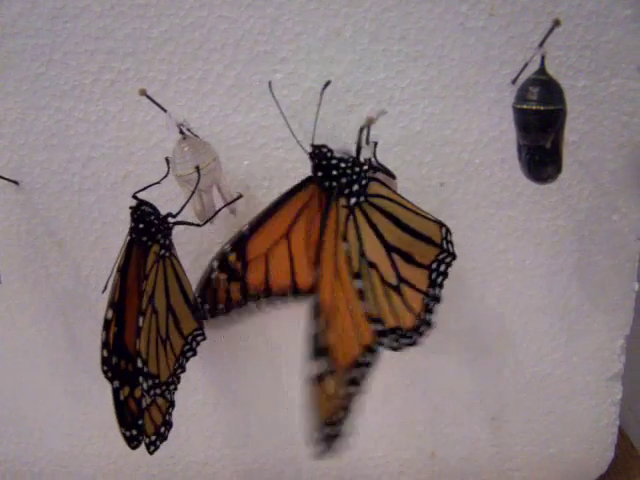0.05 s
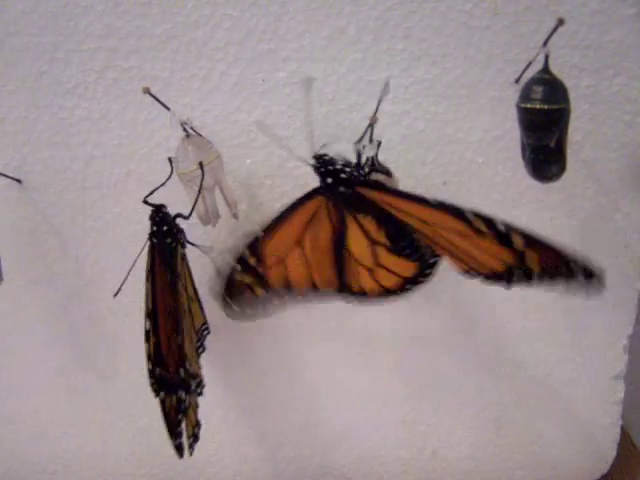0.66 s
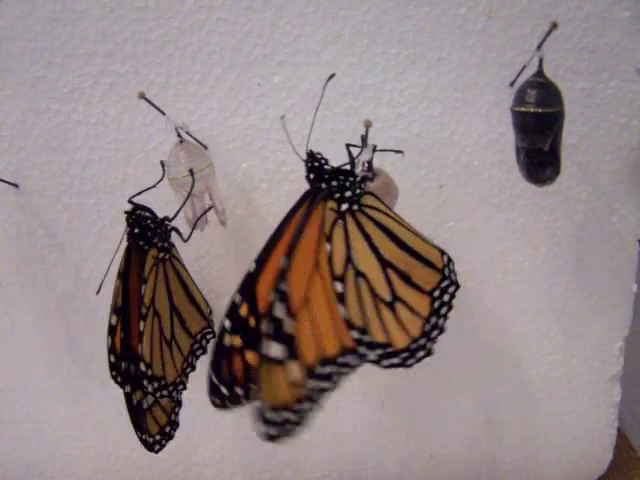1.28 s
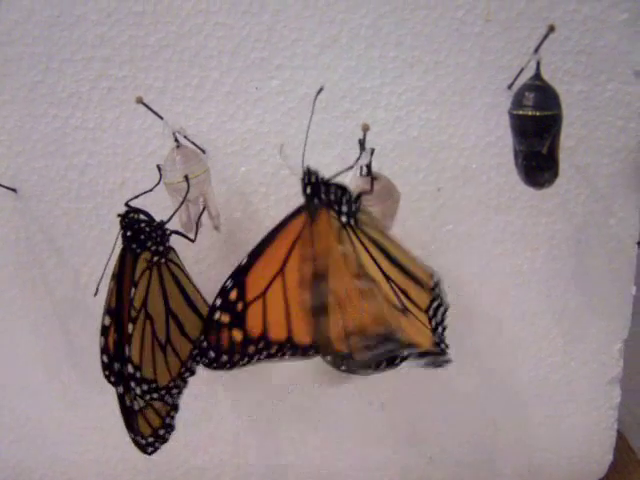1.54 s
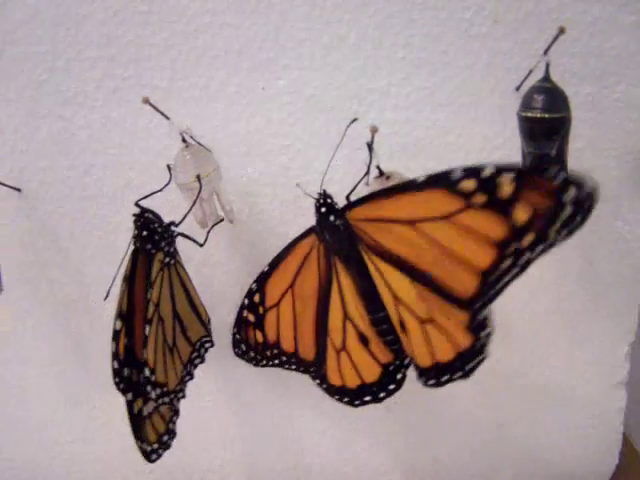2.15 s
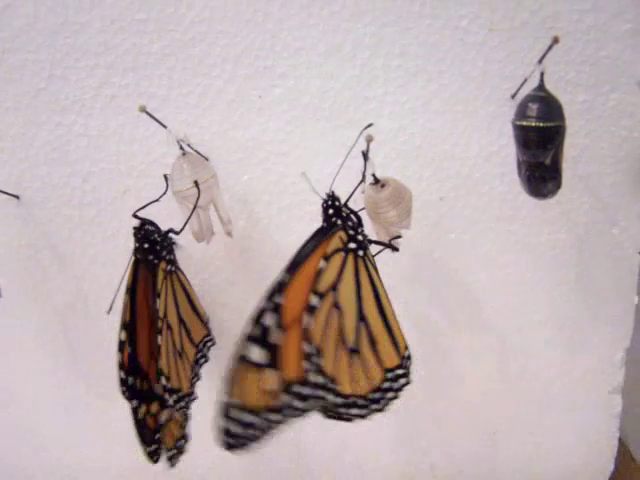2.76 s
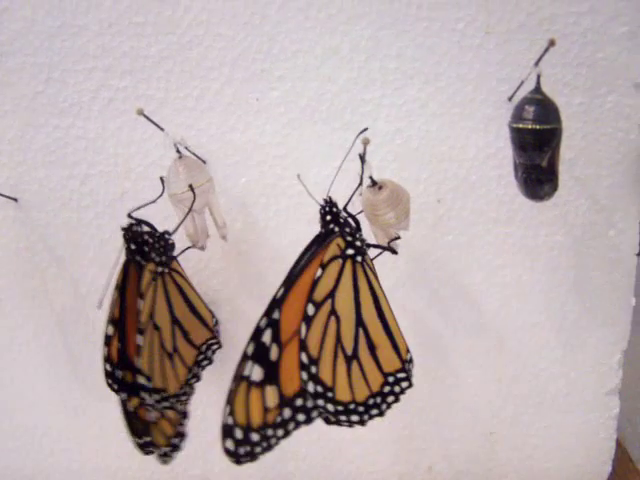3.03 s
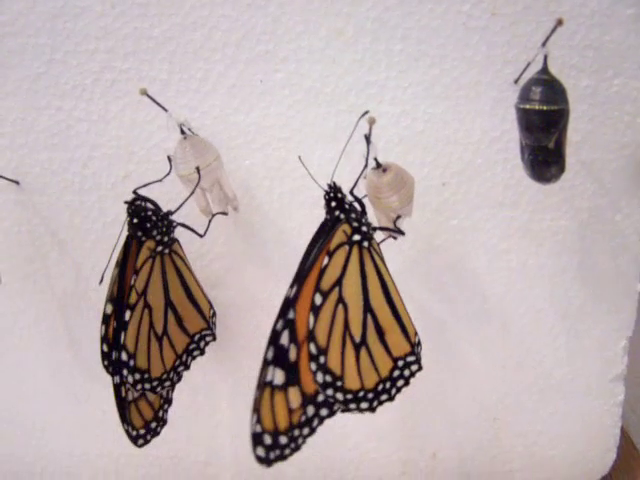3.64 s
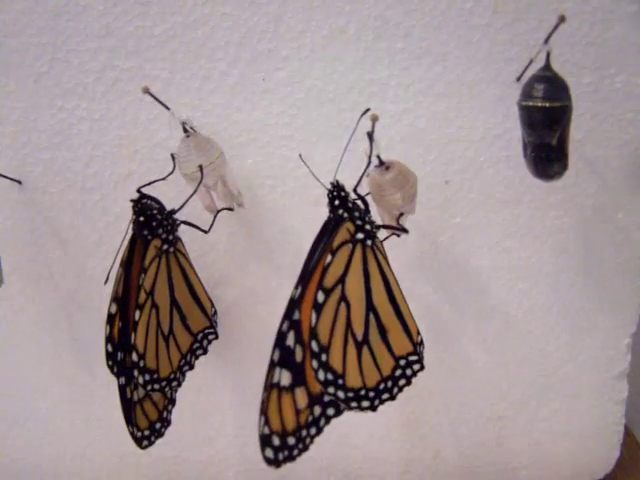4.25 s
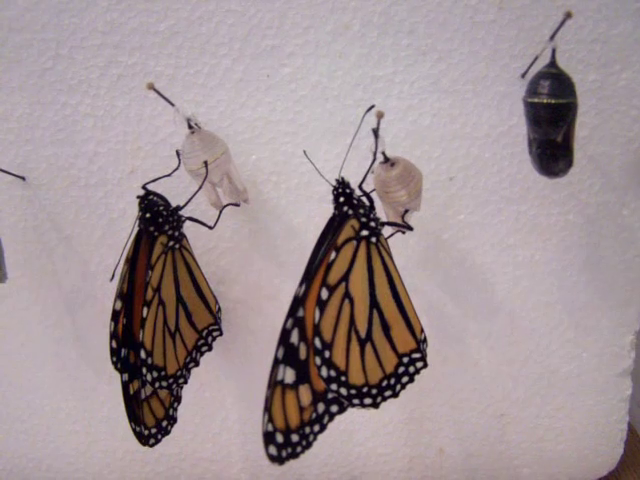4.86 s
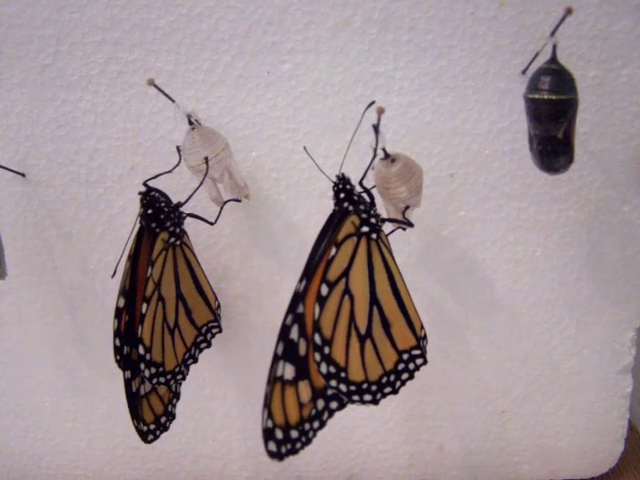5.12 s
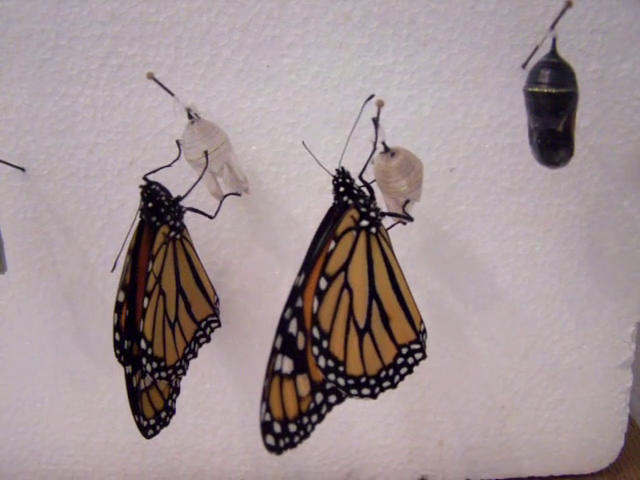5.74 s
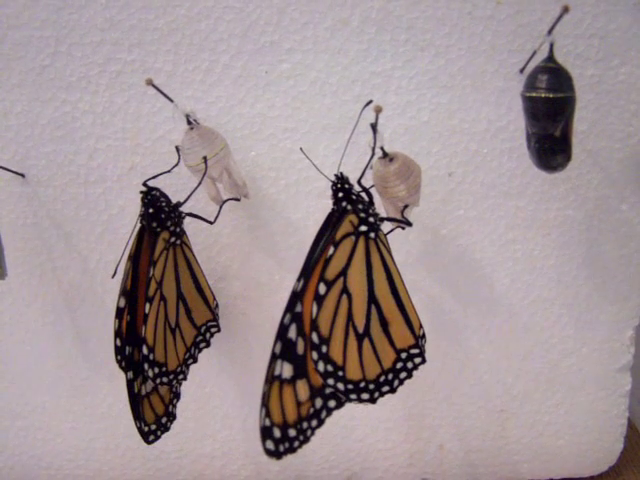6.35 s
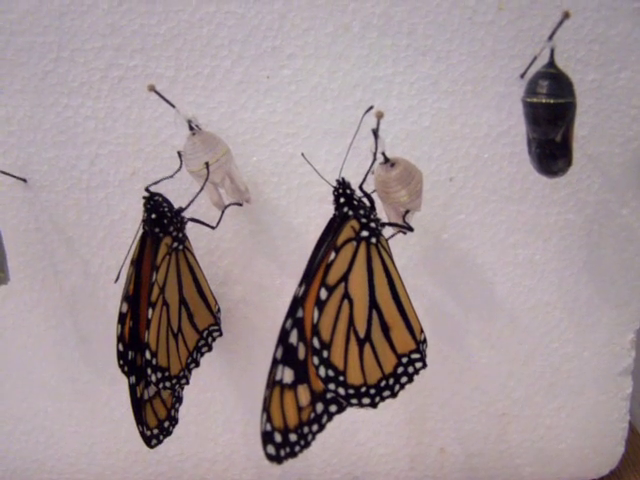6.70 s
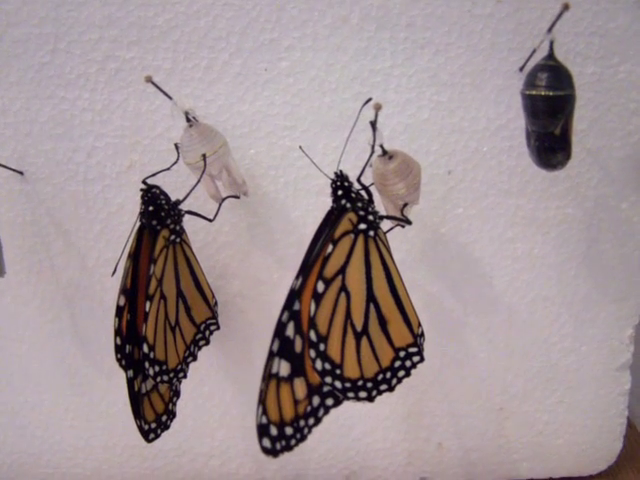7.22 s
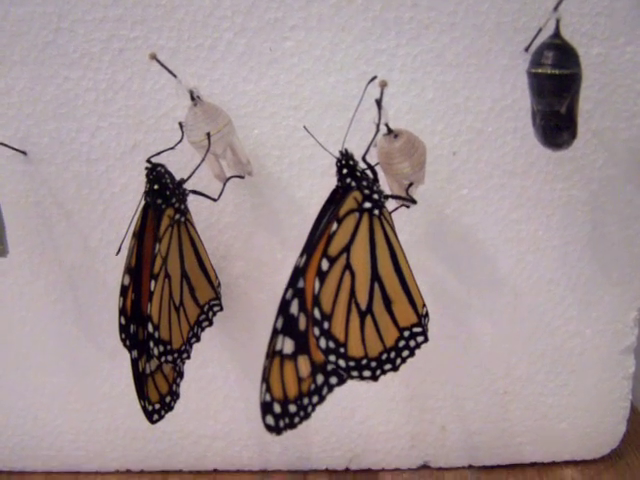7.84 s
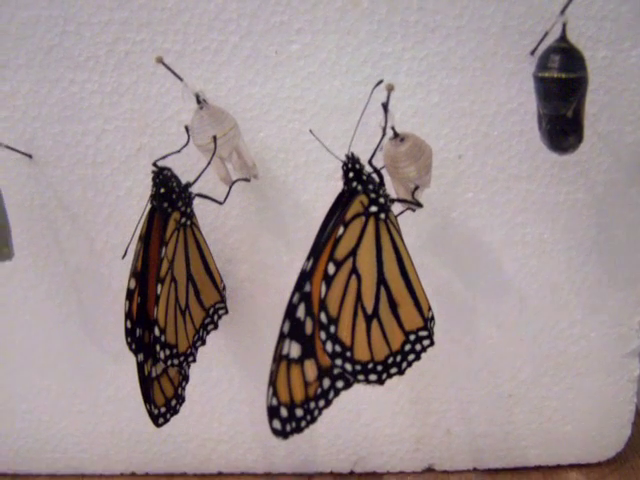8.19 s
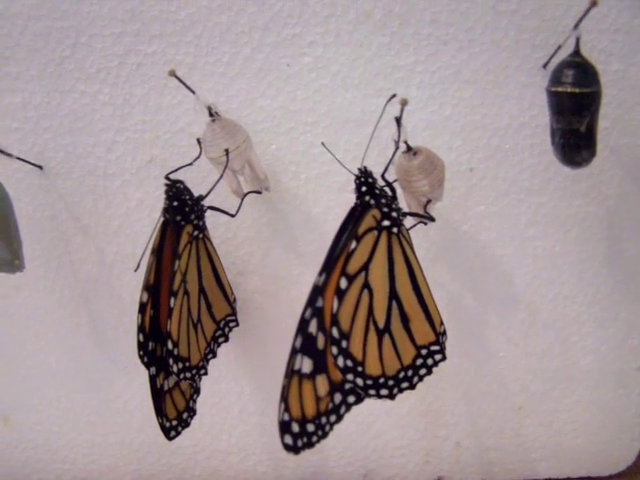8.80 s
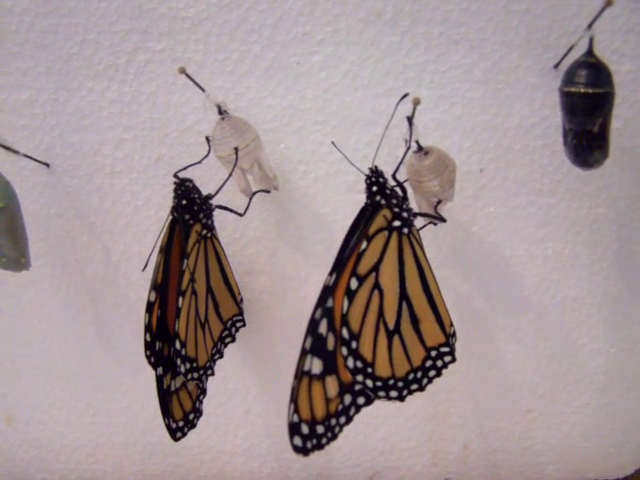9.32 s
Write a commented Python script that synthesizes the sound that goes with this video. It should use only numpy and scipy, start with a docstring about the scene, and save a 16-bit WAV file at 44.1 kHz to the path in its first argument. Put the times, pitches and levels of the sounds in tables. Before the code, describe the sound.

Light, dry pattering and rustling of wings on foam, with small claw squeaks, dying away to steady hiss and a few faint microphone bumps.

```python
"""Butterfly on a foam board

A freshly emerged butterfly flaps and scrambles on an upright foam board, then hangs still.
Wing edges and claws tap and brush the board, and a slipping claw squeaks on the foam.
The close camera is bumped softly a few times, over quiet room hiss and a thin electronic whine."""
import sys
import numpy as np
from scipy.fft import rfft, irfft, next_fast_len
from scipy.io import wavfile
from scipy.ndimage import map_coordinates

SR = 44100
rng = np.random.default_rng(int(sys.argv[2]) if len(sys.argv) > 2 else 0)


def bounce(signal):
    """Save signal as a 16-bit WAV file at the path given by the first command-line argument."""
    frames = np.transpose(np.atleast_2d(signal))
    limited = np.clip(frames, -1, 1)
    pcm = np.round(limited * 32767).astype(np.int16)
    wavfile.write(sys.argv[1], SR, pcm)


N = 414981

# Sweeps of a wing over the foam: start_s, length_s, level_db, spot_hz (where the touched spot rings)
STROKES = [(0, 0.037, -48, 3850), (0.106, 0.081, -56, 1800), (.2, 0.11, -58, 3800), (0.312, .11, -51, 2420),
           (0.438, 0.14, -50.5, 3200), (0.619, .28, -52.5, 2600), (0.944, .08, -57.5, 3800),
           (1.187, .07, -58, 3600), (1.262, 0.061, -47.5, 4400), (1.35, 0.17, -53, 2000),
           (1.573, .1, -53, 5300), (1.72, 0.058, -51, 5600), (1.801, 0.081, -58, 6500),
           (1.975, .1, -55.5, 3800), (2.119, .05, -55.5, 4400), (2.265, 0.029, -57.5, 5360),
           (2.379, .02, -58, 6450), (2.447, 0.1, -49.5, 4300), (2.621, 0.059, -49, 5700),
           (2.725, .055, -54.5, 5400), (3.174, 0.11, -60.5, 4800), (3.289, .17, -60.5, 4200),
           (3.506, 0.057, -58, 4600)]


def amp(db):
    """Turn decibels into a gain."""
    return 10 ** (np.asarray(db) / 20)


def unit(x):
    """Scale a sound to an average (rms) level of 1."""
    return x / np.sqrt(np.mean(x ** 2) + 1e-20)


def gain_at(curve, hz):
    """Read the gain at hz from a curve of (pitch_hz, level_db) points."""
    pitch_hz, level_db = np.transpose(curve)
    return amp(np.interp(np.log(hz + 1), np.log(pitch_hz + 1), level_db))


def wobble(per_s, size):
    """A smooth curve through per_s random values a second."""
    values = rng.standard_normal(int(size * per_s / SR) + 4)
    return map_coordinates(values, [np.arange(size) * per_s / SR])


def filtered(x, response):
    """Filter a sound; response(hz) gives the gain at each frequency."""
    size = next_fast_len(len(x) + SR // 10)
    hz = np.fft.rfftfreq(size, 1 / SR)
    return irfft(rfft(x, size) * response(hz), size)[:len(x)]


def add(track, start_s, sound):
    """Mix a sound into the track at start_s."""
    part = track[max(0, round(start_s * SR)):][:len(sound)]
    part += sound[:len(part)]


def resonance(hz, centre, width):
    """A filter that rings at its centre frequency, where its gain is 1."""
    return 1j * hz * width / (centre ** 2 - hz ** 2 + 1j * hz * width)


def bands(x):
    """Split a sound into low thud, middle body and high edge."""
    # Borders of the three bands: border_hz
    borders = (0, 2400, 4600, 22050)
    below = lambda hz, border: 1 / (1 + (hz / (border + 1)) ** 20)
    return [filtered(x, lambda hz: below(hz, high) - below(hz, low))
            for low, high in zip(borders, borders[1:])]


def room(hiss_db=-57):
    """Even hiss and low room rumble, with a faint, slightly unsteady hum and whine."""
    # Tone of the room noise: pitch_hz, relative_db
    hiss_curve = [(12, -38.5), (20, -8), (44, -1), (125, -0.5), (208, -2), (374, -4.5), (414, -5.5),
                  (725, -9), (803, -9), (1300, -11), (2460, -13), (3430, -13.5), (3700, -13), (7950, -17.5),
                  (8800, -31.5), (11400, -57), (19400, -120)]
    # Hum and electronic whine: pitch_hz, level_db
    tones = [(123, -84), (2540, -79.5), (7837, -79.5), (7867, -77.5), (7897, -83), (8103, -79), (8133, -76)]
    t = np.arange(N) / SR
    hiss = unit(filtered(rng.standard_normal(N), lambda hz: gain_at(hiss_curve, hz)))
    whine = sum(amp(db) * np.sqrt(2) * np.sin(2 * np.pi * hz * t + 0.17 * wobble(4, N))
                for hz, db in tones)
    return amp(hiss_db) * hiss + whine


def camera_bumps(thump_rise_s=0.0034, knock_rise_s=0.0012):
    """A soft bump rocks the camera's mount and knocks its housing."""
    # Bumps: start_s, thump_db, knock_db, muffled_above_hz
    bumps = [(3.262, -35, -42, 1700), (6.7845, -46.5, -41.5, 2300), (7.774, -53, -38.5, 524),
             (7.838, -55, -50, 250), (8.156, -53, -55, 400)]
    # Low tones of the mount: pitch_hz, relative_db, ring_s (time to fade by 60 dB)
    mount = [(77, -6.5, 0.23), (140.5, 3.5, .085)]
    # Tones of the housing: pitch_hz, relative_db, ring_s
    housing = [(193, -7.5, 0.085), (396, -16.5, 0.22), (484, -8.5, 0.083), (755, 3, 0.034),
               (1164, -0.5, 0.038), (1650, 0.5, 0.032), (1975, 0.5, 0.025), (2250, -5, .02)]
    out, t = np.zeros(N), np.arange(SR // 4) / SR
    tone = lambda hz, db, ring_s: amp(db - 60 * t / ring_s) * np.sin(2 * np.pi * (hz * t + rng.random()))
    for start_s, thump_db, knock_db, muffle_hz in bumps:
        thump = sum(tone(*row) for row in mount)
        knock = sum(tone(hz, db, ring_s) / np.hypot(1, (hz / muffle_hz) ** 3)
                    for hz, db, ring_s in housing)
        add(out, start_s, amp(thump_db) * thump * (1 - np.exp(-t / thump_rise_s)))
        add(out, start_s, amp(knock_db) * knock * (1 - np.exp(-t / knock_rise_s)))
    return out


def board(hz, direct=0.6, bass_delay_s=0.0044, bend_hz=2100):
    """The foam board as a filter. Bending waves bring the treble first, so each tap chirps down."""
    # Resonances of the board: pitch_hz, width_hz, relative_db
    resonances = [(185, 31, 14.5), (512, 55, 2), (1406, 46, 10.5), (1788, 64, 6), (1993, 77, 0.5),
                  (2304, 83, -2.5), (2490, 32, 0), (2920, 44, -9.5), (3104, 160, -4), (3420, 260, -13),
                  (3800, 220, 2.5), (5780, 210, -11.5), (6700, 250, -8), (7270, 560, 1)]
    # Tone of a dry contact: pitch_hz, relative_db
    contact_curve = [(100, -22), (450, -1), (1000, -3.5), (2000, -4.5), (3200, 3.5), (4500, -1), (5600, -2),
                     (6400, -7.5), (7400, -12), (9000, -11.5)]
    ring = sum(amp(db) * resonance(hz, centre, width) for centre, width, db in resonances)
    delay_s = bass_delay_s / (1 + (hz / bend_hz) ** 2)
    lag_cycles = np.cumsum(delay_s) * hz[1]  # hz[1] is the step between frequencies
    return gain_at(contact_curve, hz) * (direct + ring) * np.exp(-2j * np.pi * lag_cycles)


def band_levels(spot_hz):
    """Thud, body and edge of a spot, in dB: slack spots thud, stiff spots tick brightly."""
    # Tone of the spots, relative to their body band: spot_hz, thud_db, edge_db
    spot_tones = [(1400, -1.5, -5.5), (1900, 1.5, -3), (3200, -10, -18), (3860, -14.5, -6.5),
                  (4730, -10.5, -2), (5600, -3.5, 3.5), (6400, -6.5, -3)]
    hz, thud_db, edge_db = np.transpose(spot_tones)
    return np.array([np.interp(spot_hz, hz, thud_db), 0, np.interp(spot_hz, hz, edge_db)])


def claw_drags(rise_s=0.003):
    """Uneven friction makes the foam sing hoarsely at one pitch, fading as the claw slows."""
    # Drags: start_s, level_db, fade_s, pitch_hz, half_width_hz
    drags = [(0.393, -46, 0.041, 3870, 90), (.478, -47, 0.016, 3930, 70), (.522, -47, 0.044, 3880, 110),
             (3.189, -48.5, 0.032, 3920, 400), (8.36, -63, .07, 4140, 35)]
    out, t = np.zeros(N), np.arange(SR // 5) / SR
    for start_s, db, fade_s, pitch_hz, half_width in drags:
        friction = rng.standard_normal(len(t))
        sing = unit(filtered(friction, lambda hz: resonance(hz, pitch_hz, 2 * half_width) ** 2))
        add(out, start_s, amp(db) * sing * (1 - np.exp(-t / rise_s)) * np.exp(-t / fade_s))
    return out


def claw_squeaks(waver=0.012, glide=0.23, rasp_db=-3, overtone_db=-29, ring_db=-20, ring_s=0.012):
    """A claw sticks and slips: the squeak starts raspy, glides up to a board resonance and rings off."""
    # Slips: start_s, level_db, length_s, pitch_hz
    slips = [(0.264, -37.5, 0.006, 3820), (0.339, -36.5, .008, 3900), (0.383, -30, 0.0073, 3900),
             (0.438, -38, 0.0091, 3890), (0.4637, -27.5, 0.014, 3895), (0.5045, -25, 0.0055, 3844),
             (.590, -39.5, .006, 3900), (0.623, -36.5, 0.013, 3860), (0.699, -38, 0.006, 3880),
             (0.731, -20.5, 0.0105, 3865), (.750, -33, 0.0075, 3850), (0.759, -41, 0.0083, 3920),
             (0.769, -38, 0.013, 3860), (1.378, -36, 0.0083, 3910)]
    out, t = np.zeros(N), np.arange(SR // 10) / SR
    for start_s, db, length_s, hz in slips:
        progress = t / length_s
        swell = (1 - np.exp(-(progress / 0.19) ** 2)) * np.exp(-(progress / 1.14) ** 2)
        tail = amp(ring_db) * (1 - np.exp(-progress)) * np.exp(-t / ring_s)
        pitch = hz * (1 - glide * np.exp(-t / 0.001) + waver * wobble(350, len(t)))
        phase = 2 * np.pi * np.cumsum(pitch) / SR
        tone = (swell + tail) * (np.sin(phase) + amp(overtone_db) * np.sin(2 * phase))
        rasp = filtered(rng.standard_normal(len(t)) * np.exp(-progress / 0.23), board)
        add(out, start_s, amp(db) * (tone + amp(rasp_db) * rasp / np.abs(rasp).max()))
    return out


def wing_pressure(length_s, press_s=0.014, lift_s=0.038, ease_db=2):
    """A wing presses on the foam, eases along the stroke and lifts off."""
    t = np.arange(SR // 2) / SR
    press = 1 - np.exp(-t / press_s)
    ease = amp(-ease_db * np.minimum(t / length_s, 1))
    lift = np.exp(-np.maximum(t - length_s, 0) / lift_s)
    return press * ease * lift


def wing_brushing(clicks_per_s=1500, size_db=3.5, hiss=0.22, flutter_db=2, colour_db=2.5):
    """Wing scales catch on foam beads: clumps of tiny clicks, coloured by the spots they slide over."""
    # Tone of the brushing, relative to the stroke: thud_db, body_db, edge_db
    brush_db = [3, -.5, 1.5]
    clicks = (rng.random(N) < clicks_per_s / SR) * rng.choice([-1, 1], N)
    sizes = amp(size_db * np.minimum(rng.exponential(size=N), 4))
    force = (clicks * sizes + hiss * rng.standard_normal(N)) * amp(flutter_db * wobble(90, N))
    rustle = np.array([band * amp(colour_db * wobble(60, N)) for band in bands(filtered(force, board))])
    gains = np.zeros_like(rustle)
    for start_s, length_s, db, spot_hz in STROKES:
        for gain, band_db in zip(gains, brush_db + 0.34 * band_levels(spot_hz)):
            add(gain, start_s, amp(db + band_db) * wing_pressure(length_s))
    return (gains * rustle).sum(0) / np.std(rustle.sum(0))


def wing_catches(count=3, relative_db=-4.5, scatter_db=1.5, contact_s=0.003, scatter_octaves=0.25):
    """The wing edge catches lightly a few times in each stroke; returns contacts for taps()."""
    contacts = []
    for start_s, length_s, db, spot_hz in STROKES:
        times = start_s + length_s * (np.arange(count) + rng.random(count)) / count
        for when, (size, shift) in zip(times, rng.uniform(-1, 1, (count, 2))):
            level_db = db + relative_db + scatter_db * size
            contacts.append((when, level_db, contact_s, spot_hz * 2 ** (scatter_octaves * shift)))
    return contacts


def board_knocks(rise_s=0.00043):
    """A heavy blow bends the whole board, which answers with a hollow knock."""
    # Heavy blows: start_s, level_db
    blows = [(0.6238, -46), (0.7326, -56), (2.645, -33)]
    # Slow bending of the board: pitch_hz, relative_db, ring_s (time to fade by 60 dB)
    tones = [(542, -12, 0.17), (680, 3.5, 0.0098), (835, -16, 0.11)]
    out, t = np.zeros(N), np.arange(SR // 5) / SR
    ring = sum(amp(db - 60 * t / ring_s) * np.sin(2 * np.pi * hz * t) for hz, db, ring_s in tones)
    for start_s, db in blows:
        add(out, start_s, amp(db) * ring * (1 - np.exp(-t / rise_s)))
    return out


def board_ring(contacts, pitch_hz=1415, relative_db=-3, ring_s=0.091, rise_s=0.0038, scatter=0.013):
    """The thud of each contact spreads through the board and lingers as its strongest tone."""
    out, t = np.zeros(N), np.arange(SR // 10) / SR
    fade = (1 - np.exp(-t / rise_s)) * amp(-60 * t / ring_s)
    for start_s, db, _, spot_hz in contacts:
        detune, phase = rng.standard_normal(2)
        tone = np.sin(2 * np.pi * (pitch_hz * (1 + scatter * detune) * t + phase))
        thud_db = band_levels(spot_hz)[0]
        add(out, start_s, amp(db + thud_db + relative_db) * fade * tone)
    return out


def taps(contacts, snap=4, drag_db=-23, drag_s=0.016, spot_db=6, bass_hz=850, treble_hz=6400):
    """Each contact is a snap and a short scrape that rings the struck spot and the board."""
    out, t = np.zeros(N), np.arange(SR // 10) / SR
    lead, onset = SR // 1000, round(0.012 * SR)  # samples: silence ahead, span that sets the level
    # so light a wing hardly stirs the board's low tones
    bass_cut = lambda hz: (1j * hz / (bass_hz + 1j * hz)) ** 2
    for start_s, db, contact_s, spot_hz in contacts:
        rise = 1 - np.exp(-t / (0.17 * contact_s))  # long contacts start more softly
        fall = np.exp(-t / contact_s) + amp(drag_db) * np.exp(-t / drag_s)
        force = rng.standard_normal(len(t)) * rise * fall
        force[0] += snap / (1 + contact_s * 500)
        # a stiffer spot rings higher and passes more treble
        spot = lambda hz: 1 + amp(spot_db) * resonance(hz, spot_hz, 0.093 * spot_hz)
        treble_cut = lambda hz: 1 / np.hypot(1, (hz / max(treble_hz, 1.12 * spot_hz)) ** 4)
        response = lambda hz: board(hz) * spot(hz) * treble_cut(hz) * bass_cut(hz)
        tap = filtered(np.pad(force, (lead, 0)), response)
        for band, band_db in zip(bands(tap), band_levels(spot_hz)):
            add(out, start_s - lead / SR, amp(db + band_db) * band / np.std(band[:onset]))
    return out


def scene():
    """Mix the butterfly, camera bumps and room, all close and dry, in one channel."""
    # The clearest wing and claw contacts: start_s, level_db, contact_s, spot_hz
    clear_taps = [(.0047, -38, 0.0012, 4400), (.031, -51, .0033, 3680), (.0999, -36.5, .0018, 3600),
                  (.2373, -53, .0021, 6100), (.2641, -53, .0025, 3800), (.3035, -43.5, 0.0037, 1810),
                  (.319, -45, .0014, 1760), (0.3841, -39.5, 0.0026, 3950), (.402, -49, .0046, 4200),
                  (.4638, -45.5, 0.0063, 2800), (.5041, -38.5, 0.0054, 3160), (.512, -41, 0.0055, 3150),
                  (.6238, -51, .002, 1800), (.6703, -51, 0.0015, 1820), (.7316, -52, 0.0032, 1400),
                  (.8234, -49, .0037, 1400), (0.8759, -50, 0.0012, 6650), (1.004, -54, .0033, 3440),
                  (1.043, -56.5, 0.0036, 4600), (1.271, -46.5, .005, 3950), (1.2914, -47.5, .0045, 5000),
                  (1.3691, -46.5, 0.0055, 3780), (1.425, -51.5, .0023, 1380), (1.477, -58, 0.0018, 2090),
                  (1.5956, -55, .002, 4600), (1.745, -53.5, 0.0019, 5640), (1.7632, -51, 0.0039, 5550),
                  (1.857, -55.5, .0019, 5450), (1.881, -55, 0.0011, 7300), (2.1364, -43.5, 0.0012, 4850),
                  (2.265, -49.5, 0.001, 3960), (2.444, -55, .003, 4700), (2.4514, -45.5, 0.0054, 2060),
                  (2.4717, -50, 0.0016, 4610), (2.4931, -46.5, 0.0011, 3930), (2.5086, -44, 0.0014, 5400),
                  (2.5417, -49.5, 0.001, 3790), (2.634, -55, 0.0088, 5600), (2.6449, -43, 0.0017, 6470),
                  (2.657, -48, .0027, 6700), (2.6702, -41, 0.0011, 6900), (2.679, -48.5, .002, 6500),
                  (2.904, -52.5, 0.00065, 5130), (2.998, -47, 0.0016, 5530), (3.022, -56.5, .001, 5540),
                  (3.1447, -58, .0007, 5580), (3.1599, -49.5, 0.0016, 2250), (3.179, -55, .0012, 5460),
                  (3.185, -39.5, 0.00096, 4050), (3.5522, -52.5, 0.0011, 5600), (3.838, -57.5, .003, 3190),
                  (4.322, -62, .004, 3000), (4.564, -66.5, .004, 3500), (4.768, -65, .005, 3700)]
    contacts = clear_taps + wing_catches()
    wings = taps(contacts) + board_ring(contacts) + board_knocks() + wing_brushing()
    claws = claw_squeaks() + claw_drags()
    return (wings + claws + camera_bumps() + room())[None]


def record(dry, top_hz=8650):
    """The camera dulls the treble and cuts it off steeply above top_hz."""
    # The microphone's weak treble: pitch_hz, gain_db
    microphone = [(7500, -0.5), (8200, -6), (8900, -2.5)]
    response = lambda hz: gain_at(microphone, hz) / (1 + (hz / top_hz) ** 70)
    return np.array([filtered(channel, response) for channel in dry])


dry = scene()
out = record(dry)
bounce(out)
```